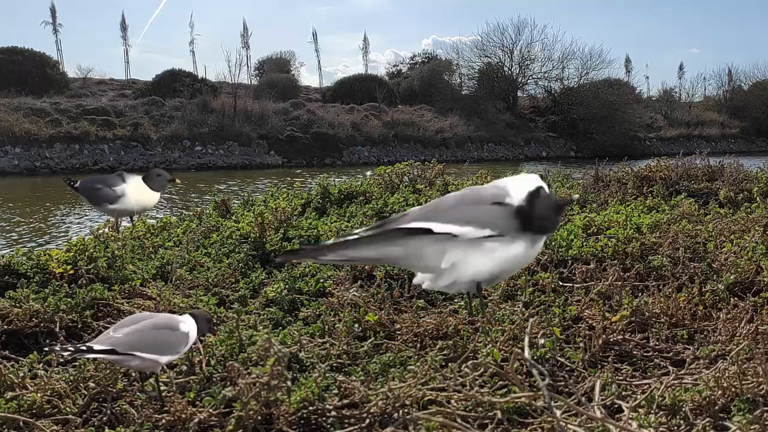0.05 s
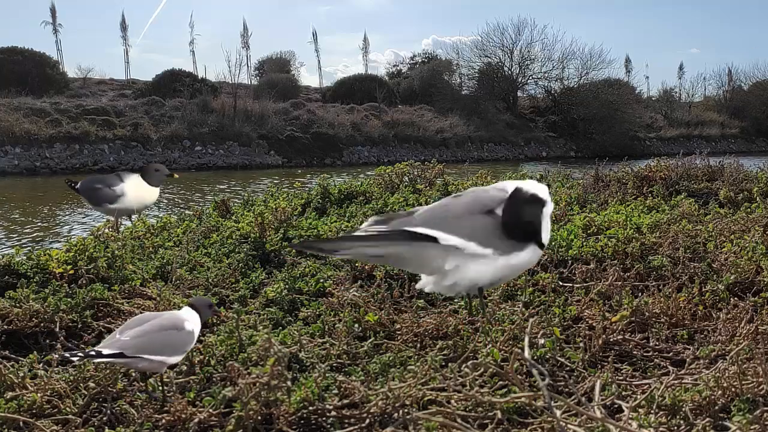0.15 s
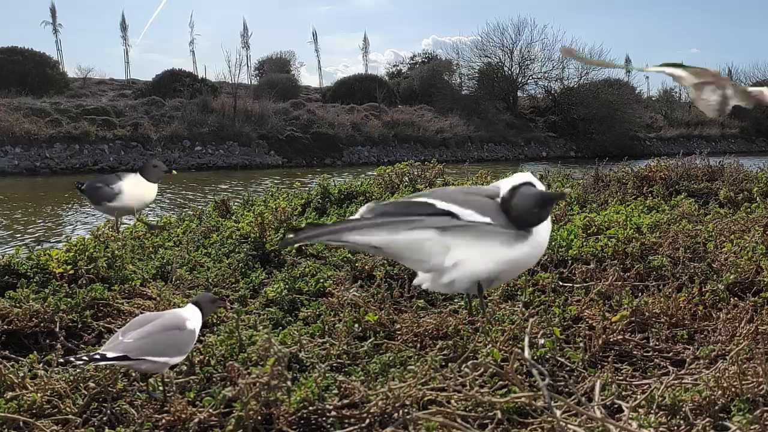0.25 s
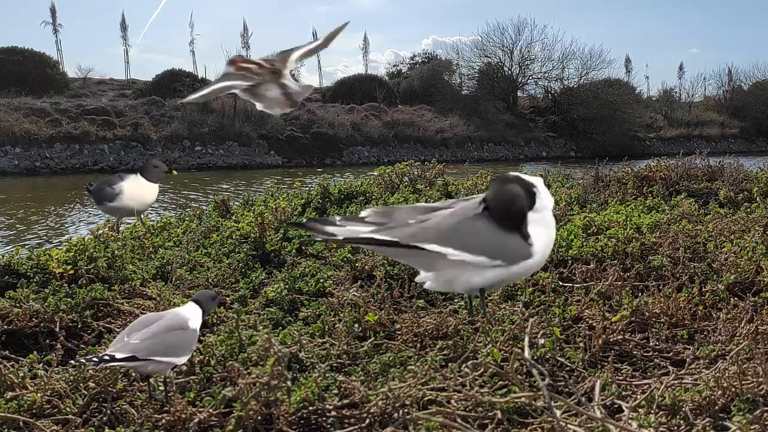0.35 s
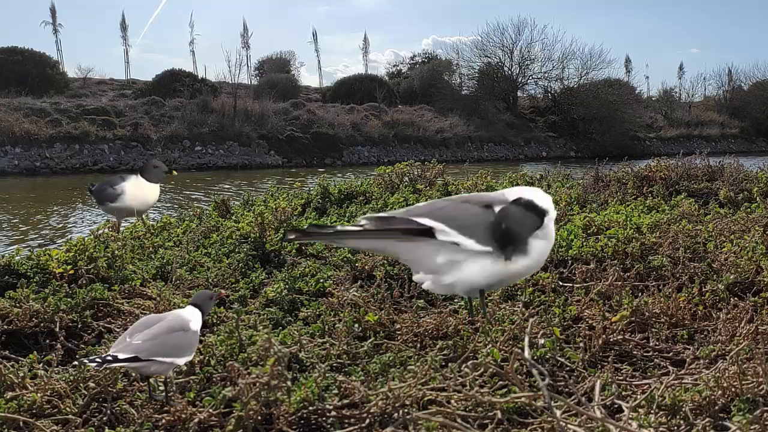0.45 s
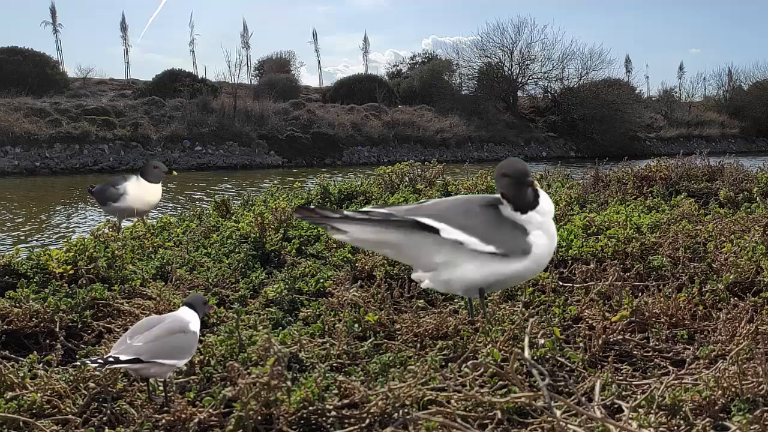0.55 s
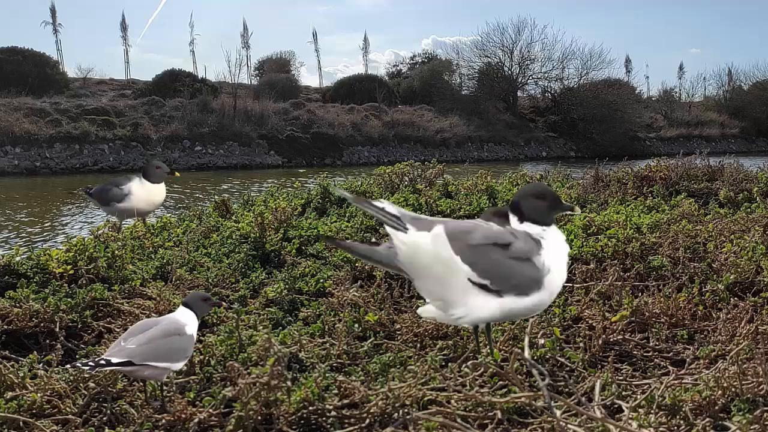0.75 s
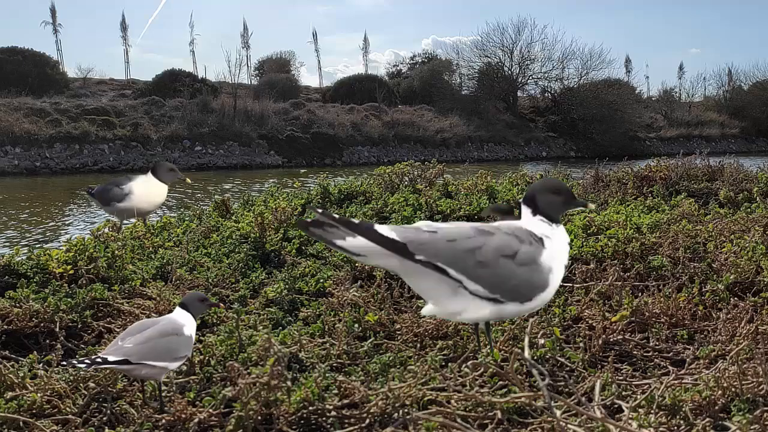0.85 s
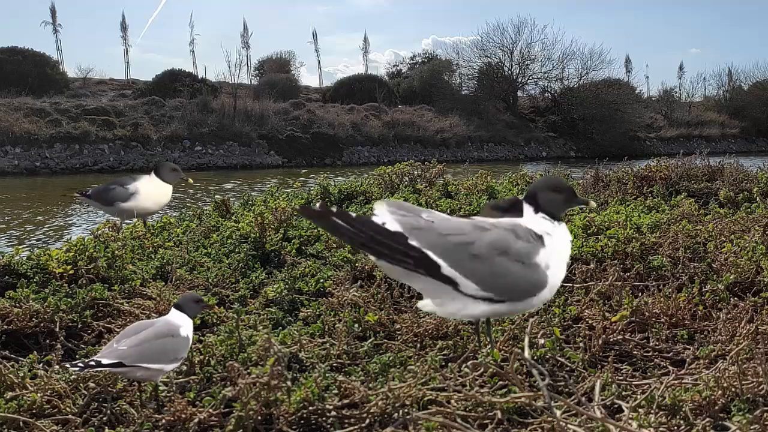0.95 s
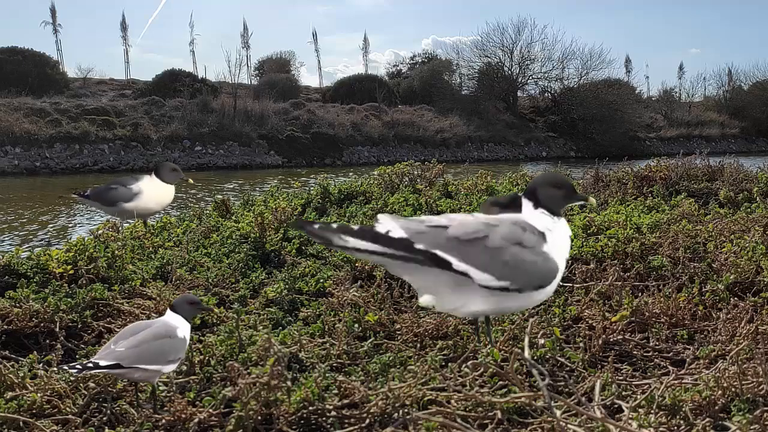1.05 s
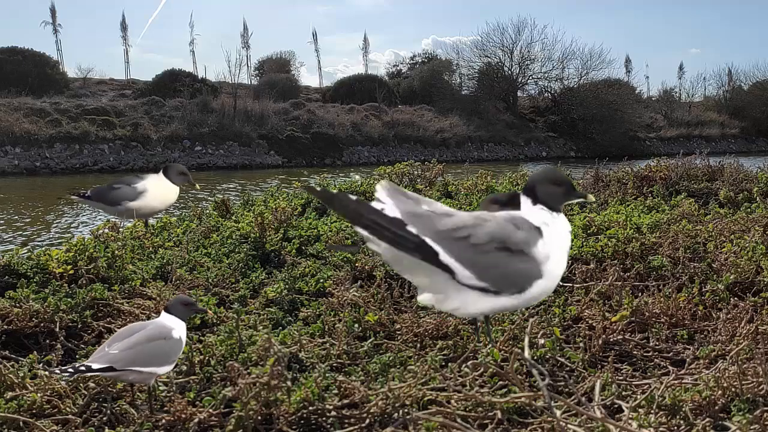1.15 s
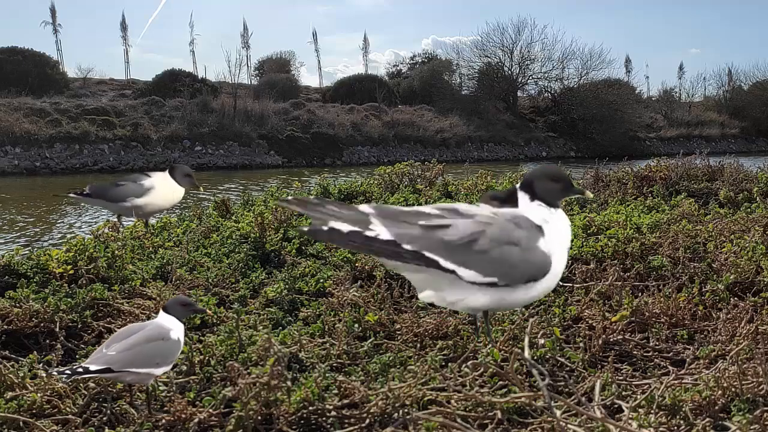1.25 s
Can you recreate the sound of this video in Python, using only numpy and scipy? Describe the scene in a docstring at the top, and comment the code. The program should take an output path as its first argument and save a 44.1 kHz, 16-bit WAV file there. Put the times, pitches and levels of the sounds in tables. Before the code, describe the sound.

A gull gives six quick harsh calls close by, over faint chirps and low wind.

```python
"""Six harsh calls chatter from a gull close by on the right, on a grassy bank beside a channel.
A soft croak leads in; each call is a rattle of three or four bursts, each burst a few voice pulses
near 1 kHz that ring the throat. Grass and bank reflect the sound. Far birds chirp and whistle,
something rustles softly, and wind rumbles over a low drone and a faint hiss."""
import sys
import numpy as np
from scipy import signal
from scipy.fft import rfft, irfft
from scipy.io import wavfile
from scipy.ndimage import uniform_filter1d

SR = 44100
rng = np.random.default_rng(int(sys.argv[2]) if len(sys.argv) > 2 else 0)


def wav_out(sig):
    """Save sig, one row per channel (or a flat mono array), as 16-bit PCM at SR to the path in sys.argv[1]."""
    wavfile.write(sys.argv[1], SR, np.round(np.clip(np.atleast_2d(sig).T, -1, 1) * 32767).astype(np.int16))


N = 57330
TIME_S = np.arange(N) / SR


def undb(db):
    """Decibels to gain."""
    return 10 ** (np.asarray(db) / 20)


def unit(x):
    """Scale to rms 1."""
    return x / np.sqrt(np.mean(x ** 2))


def pan(x, db):
    """Place by level difference; positive dB is left."""
    gains = undb(np.array([[db], [-db]]) / 2)
    return x * gains / gains.mean()


def add(out, x, start_s):
    """Mix x into out from start_s."""
    i = max(int(start_s * SR), 0)
    out[i:i + len(x)] += x[:max(len(out) - i, 0)]


def sine(hz):
    """Sine following a frequency track."""
    return np.sin(2 * np.pi * np.cumsum(hz) / SR)


def curve_db(points, hz):
    """Interpolate (frequency [Hz], level [dB]) points on a log-frequency axis."""
    point_hz, db = np.array(points).T
    return np.interp(np.log(np.maximum(hz, 1)), np.log(point_hz), db)


def noise(spectrum):
    """Coloured noise, rms 1."""
    gain = undb(curve_db(spectrum, np.fft.rfftfreq(N, 1 / SR)))
    return unit(irfft(rfft(rng.standard_normal(N)) * gain, N))


def stereo_noise(spectrum, side_db):
    """Coloured mid/side noise, rms 1."""
    return unit(noise(spectrum) + undb(side_db) * noise(spectrum) * np.array([[1], [-1]]))


def walk(rate_hz):
    """Smooth random drift, rms 1."""
    hold = int(SR / rate_hz)
    steps = np.repeat(rng.standard_normal(N // hold + 1), hold)
    return unit(uniform_filter1d(uniform_filter1d(steps, hold), hold)[:N])


def scatter(x, t60_s):
    """Decaying diffuse reflections, uncorrelated left and right."""
    t = TIME_S[:N // 2]
    onset = np.minimum(t / 0.0038, 1)
    tail = rng.standard_normal((2, len(t))) * undb(-60 * t / t60_s) * onset
    tail /= np.sqrt(np.sum(tail ** 2) / 2)
    return signal.fftconvolve(x[None], tail, axes=1)[:, :N]


def wind():
    """Low rumble, drifting in level."""
    # rumble density (frequency [Hz], level [dB])
    spectrum = [(20, -3), (35, 0), (60, -1.5), (85, -4.5), (130, -7.5), (220, -14), (400, -27), (800, -37),
                (2000, -69.5)]
    return undb(-51.5 + 1.5 * walk(rate_hz=7)) * stereo_noise(spectrum, side_db=-12)


def drone():
    """Low tone, wavering in pitch and level."""
    # drone envelope (time [s], level [dB])
    envelope = [(0.0, -43), (0.17, -53), (0.206, -65), (0.238, -46.5), (0.466, -46.5), (0.514, -65),
                (0.622, -44), (0.684, -60.5), (0.916, -45), (0.998, -72), (1.042, -46.5), (1.07, -61),
                (1.234, -48.5), (1.3, -50)]
    level_db = np.interp(TIME_S, *np.array(envelope).T) - .5
    pitch_hz = 55.5 + 3 * walk(rate_hz=14.12)
    return undb(level_db) * np.sqrt(2) * sine(pitch_hz)


def hiss():
    """Faint airy noise, easing in the second half."""
    # hiss density (frequency [Hz], level [dB])
    spectrum = [(100, -8), (400, -0.5), (1000, -5.5), (2000, -10), (3200, -9.5), (5000, -19), (9000, -16.5),
                (11500, -33.5), (16000, -40)]
    # hiss envelope (time [s], level [dB])
    envelope = [(0, 0), (.4, 0.5), (.8, -2), (1.05, -3.5), (1.15, -3.5), (1.3, -3.5)]
    level_db = -63 + np.interp(TIME_S, *np.array(envelope).T) + .6 * walk(rate_hz=14)
    return undb(level_db) * stereo_noise(spectrum, side_db=-1)


def rustle():
    """Two soft swells of bright, flickering noise."""
    # rustle density (frequency [Hz], level [dB])
    spectrum = [(500, -8.5), (1500, 7), (4500, 5), (9000, 7), (12000, 2.5), (16000, -2)]
    # swells (centre [s], half length [s], level [dB])
    swells = [(0.162, 0.11, -66), (0.995, 0.087, -67.5)]
    envelope = sum(undb(db) * np.exp(-((TIME_S - centre_s) / half_s) ** 4)
                   for centre_s, half_s, db in swells)
    flicker = undb(2 * walk(rate_hz=122.2))
    return envelope * flicker * stereo_noise(spectrum, side_db=-1)


def far_birds():
    """Arched chirps and thin sagging whistles: near sines on the right, with reflections."""
    # chirps (time of top [s], top pitch [Hz], level [dB])
    chirps = [(.058, 3350, -62), (.175, 3360, -62), (0.289, 3480, -59), (0.512, 3540, -56),
              (.632, 3430, -53), (.753, 3380, -60), (.874, 3450, -60), (0.985, 3376, -60),
              (1.105, 3400, -59), (1.114, 3100, -62.5), (1.187, 3250, -63), (1.222, 3540, -63),
              (1.266, 3430, -63)]
    # whistles (start [s], length [s], pitch [Hz], level [dB])
    whistles = [(0.081, 0.038, 3690, -65), (0.789, 0.059, 3710, -68), (0.917, .04, 3760, -71),
                (1.03, 0.03, 3780, -72), (1.145, 0.03, 3730, -73), (1.194, 0.038, 4500, -79),
                (1.273, .035, 3800, -76)]
    rise_s, fall_s, sweep = .010, .011, .26
    swell_s, fade_s, lead_s = .0068, .005, .002
    sag, waver = .07, .011
    out = np.zeros(N)
    for top_s, top_hz, db in chirps:
        from_top_s = (TIME_S - top_s) * np.exp(.12 * rng.standard_normal())
        arch = np.exp(-(from_top_s / np.where(from_top_s < 0, rise_s, fall_s)) ** 2)
        from_peak_s = (from_top_s + lead_s).clip(-1, 1)  # level peaks before pitch
        envelope = 1 / np.cosh(from_peak_s / np.where(from_peak_s < 0, swell_s, fade_s))
        out += undb(db) * envelope * sine(top_hz * (1 - sweep * (1 - arch)))
    for start_s, length_s, pitch_hz, db in whistles:
        share = np.clip((TIME_S - start_s) / length_s, 0, 1)
        hz = pitch_hz * (1 - sag * share) * (1 + waver * walk(rate_hz=150))
        out += undb(db) * np.abs(np.sin(np.pi * share)) ** .5 * sine(hz)
    return pan(out, db=-12.5) + undb(-20) * scatter(out, t60_s=0.35)


def throat(hz, tuning, tilt_db_oct, ring_db):
    """Response of windpipe, throat and beak: minimum phase times an all-pass."""
    # throat colour (frequency [Hz], level [dB])
    colour = [(200, -66.5), (600, -18.5), (1050, -21), (1500, -9), (2000, -15.5), (2450, -9.5),
              (2900, -1.5), (4000, -1.5), (4500, -6), (5100, -4), (5700, -9.5), (6300, -15), (7100, -13),
              (8200, -12.5), (9800, -18.5), (12000, -37.5), (13500, -63), (16000, -70.5)]
    # throat resonances (centre [Hz], width [Hz], lift [dB])
    resonances = [(3840, 170, 4.5), (7220, 440, 7.6)]
    ring_hz, ring_width_hz = 3650, 163  # windpipe
    beak_hz, smear_width_hz = 3780, 4200
    octaves = np.log2(np.maximum(hz, 1) / beak_hz).clip(-2, 2)
    db = curve_db(colour, hz / tuning) + tilt_db_oct * octaves
    for centre_hz, width_hz, lift_db in resonances + [(ring_hz, ring_width_hz, ring_db)]:
        detune = 2 * (hz / tuning - centre_hz) / width_hz
        db += 10 * np.log10(1 + (undb(lift_db) ** 2 - 1) / (1 + detune ** 2))
    cepstrum = irfft(np.log(undb(db)))
    half = len(cepstrum) // 2
    cepstrum[1:half] *= 2
    cepstrum[half + 1:] = 0
    pole = ring_hz ** 2 - hz ** 2 + 1j * hz * smear_width_hz
    smear = pole.conj() / pole  # slightly delays the band round the ring
    return np.exp(rfft(cepstrum)) * smear


def pulses(hz, shape, length_s, pitch_hz):
    """Spectrum of a few slightly uneven pulses from one side of the voice box."""
    period_jitter, force_jitter_db = .014, .9
    share, bend, level_db = np.array(shape).T
    out, at_s = 0, 0.
    for stretch, force in rng.standard_normal((24, 2)):
        fade = np.clip((length_s - at_s) * pitch_hz + .5, 0, 1)
        pulse_db = np.interp(at_s / length_s, share, level_db) + force_jitter_db * force
        out = out + fade * undb(pulse_db) * np.exp(-2j * np.pi * hz * at_s)
        rate_hz = pitch_hz * np.interp(at_s / length_s, share, bend)
        at_s += np.exp(period_jitter * stretch) / rate_hz
    return out


def burst(start_s, shape, length_s, pitch_hz, tuning, second_db, rasp_db, tilt_db_oct, ring_db):
    """The voice catches; both sides of the voice box and a rasp of air ring the throat."""
    size, second_ratio = 2048, 1.12
    catch_s, catch_db = .0008, -18  # weak pulse just ahead of the voice
    share, _, level_db = np.array(shape).T
    t, hz = TIME_S[:size], np.fft.rfftfreq(size, 1 / SR)
    first_side = pulses(hz, shape, length_s, pitch_hz)
    second_side = undb(second_db) * pulses(hz, shape, length_s, pitch_hz * second_ratio)
    voice = (first_side + second_side) * np.exp(-2j * np.pi * hz * catch_s)
    gate = np.abs(np.sin(np.pi * np.minimum(t / (2.16 * length_s), 1))) ** .5
    rasp_gain = undb(rasp_db + np.interp(t / length_s, share, level_db) / 2)
    rasp = rasp_gain * gate * rng.standard_normal(size) * np.sqrt(pitch_hz / SR)
    source = undb(catch_db + level_db[0]) + voice + rfft(rasp)
    out = np.zeros(N)
    add(out, irfft(source * throat(hz, tuning, tilt_db_oct, ring_db)), start_s - catch_s)
    return out


def gull():
    """A croak, then calls: clear opening, two-voiced middle bursts, late low ringing close."""
    # calls (start [s], opening length [s], gap to second burst [s], beat [s], middle bursts [count],
    # pitch [Hz], throat tuning [ratio], opening [dB], middle [dB], closing [dB], closing ring [dB])
    calls = [ (0.225, 0.0075, .0122, 0.0094, 1, 1061, 0.992, -5, 1.5, -1, 6.5),
             (0.3051, 0.0071, .0112, .0107, 1, 1022, 1.002, 3, 4, -3.5, 7.5),
             (0.3745, 0.0061, .0110, .0101, 2, 1023, 1.003, 4.5, 3, -1.5, 11.5),
             (0.455, 0.0063, .0112, .0105, 2, 1002, 0.99, 1.5, 1.5, -4, 13.5),
             (0.5407, .0070, .0118, .0110, 2, 955, .97, 1.5, 2.5, -3, 12.5),
             (0.6324, 0.0099, 0.013, 0.012, 2, 947, 0.96, -0.5, 2, -8.5, 13.5)]
    # burst shapes (position [share of length], pitch [ratio], level [dB])
    croak = [(0, 1.2, -10), (.3, .98, -1), (.7, 1.04, 0), (1, 1.05, -5)]
    opening = [(0, 1.0, -.5), (.3, 1.005, .5), (.65, .99, -1.5), (1, .93, -10)]
    middle = [(0, 1.03, -1), (.3, 1.0, -.5), (.65, .97, -2), (1, .86, -15)]
    closing = [(0, .87, 0), (.3, .86, -4), (.65, .84, -9), (1, .78, -15)]
    out = undb(-18) * burst(start_s=.2085, shape=croak, length_s=.0145, pitch_hz=1120, tuning=1,
                            second_db=-22, rasp_db=-14, tilt_db_oct=-9, ring_db=0)
    for (start_s, open_s, gap_s, beat_s, count, pitch_hz, tuning,
         open_db, middle_db, close_db, ring_db) in calls:
        out += undb(open_db) * burst(start_s, opening, open_s, pitch_hz, tuning,
                                     second_db=-24, rasp_db=-13, tilt_db_oct=.3, ring_db=2)
        middle_s, close_s = .005, .0065
        beats_s = start_s + gap_s + beat_s * np.arange(round(count))
        for at_s in beats_s:
            out += undb(middle_db) * burst(at_s, middle, middle_s, pitch_hz, tuning,
                                           second_db=-6, rasp_db=-13, tilt_db_oct=.2, ring_db=3)
        last_s = beats_s[-1] + 1.3 * beat_s
        out += undb(close_db) * burst(last_s, closing, close_s, pitch_hz, tuning,
                                      second_db=-38, rasp_db=-18.5, tilt_db_oct=-2, ring_db=ring_db)
    return undb(2) * out


def scene():
    """Near gull with reflections off grass and bank; far birds; background leaning left."""
    voice = gull()
    grass = undb(-16.5) * scatter(voice, t60_s=0.012)
    bank = undb(-36) * scatter(voice, t60_s=0.6)
    birds = far_birds()
    background = pan(wind() + drone(), db=7) + pan(hiss(), db=2) + pan(rustle(), db=6.5)
    return background + birds + bank + pan(voice + grass, db=-10.5)


def record(dry):
    """Steep low-pass on the top treble."""
    cutoff_hz = 15000
    return signal.sosfilt(signal.ellip(8, .2, 70, cutoff_hz, fs=SR, output="sos"), dry)


dry = scene()
out = record(dry)
wav_out(out)
```